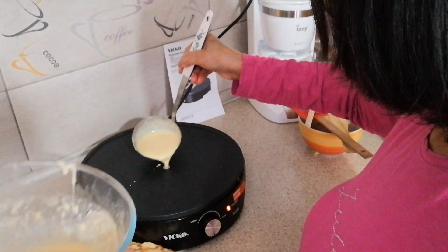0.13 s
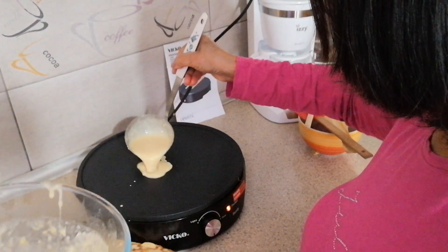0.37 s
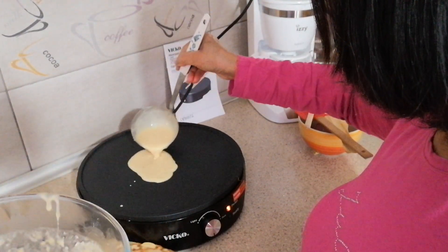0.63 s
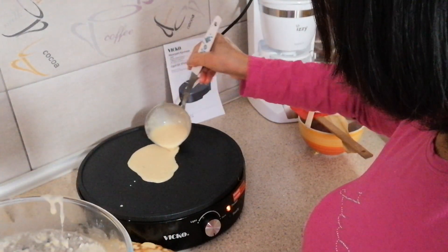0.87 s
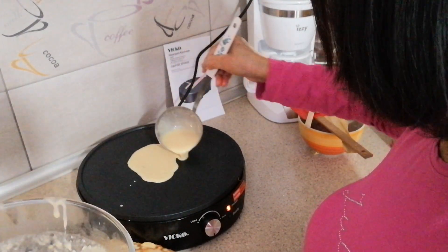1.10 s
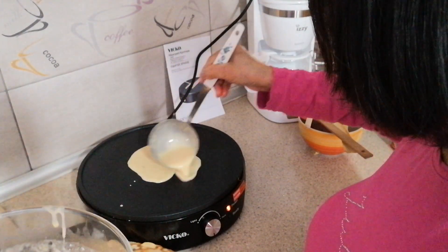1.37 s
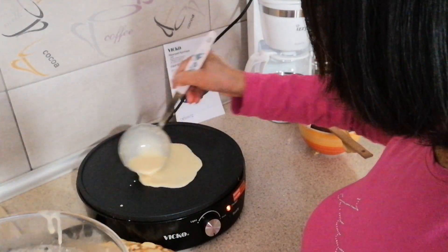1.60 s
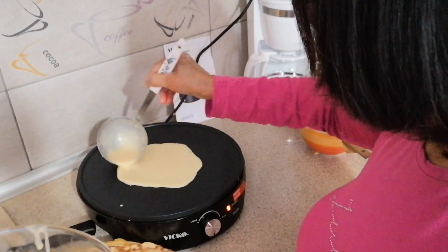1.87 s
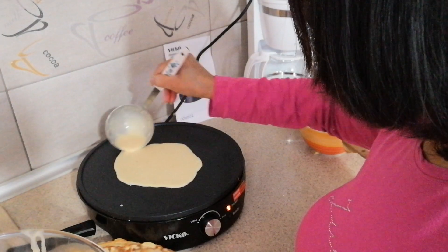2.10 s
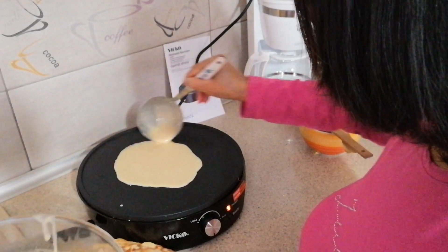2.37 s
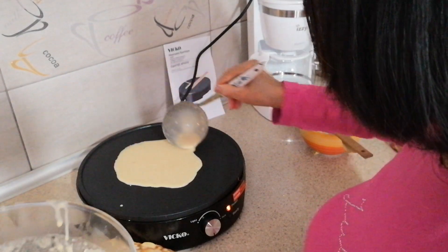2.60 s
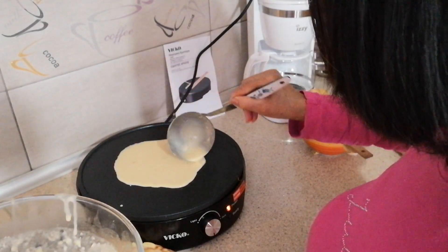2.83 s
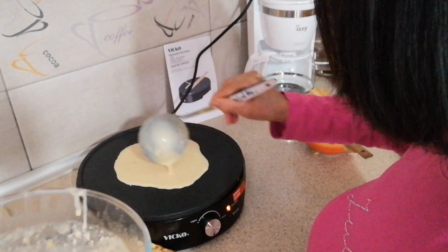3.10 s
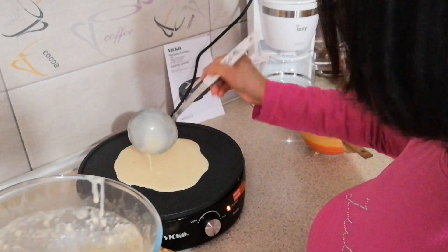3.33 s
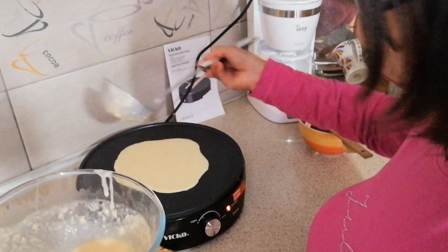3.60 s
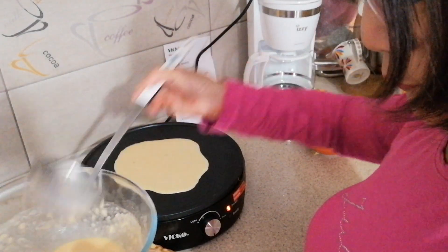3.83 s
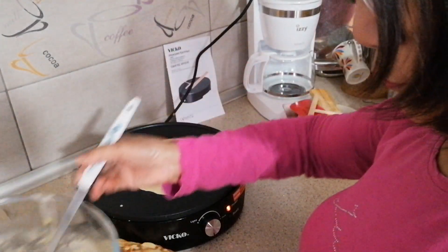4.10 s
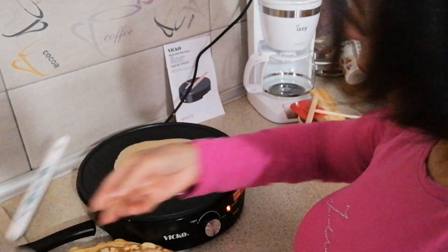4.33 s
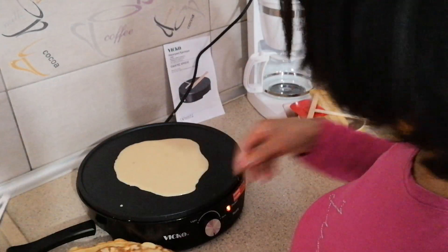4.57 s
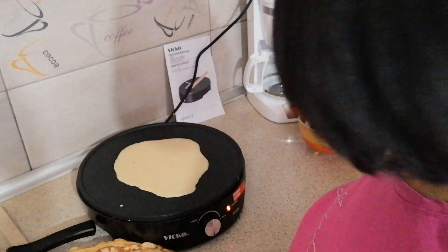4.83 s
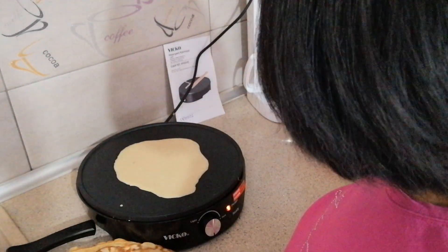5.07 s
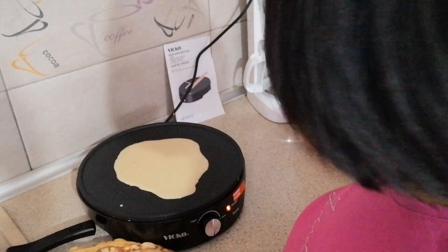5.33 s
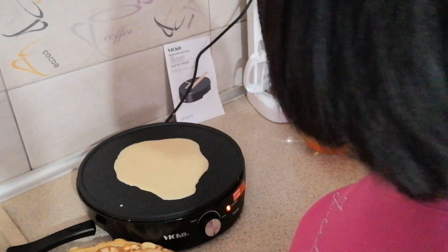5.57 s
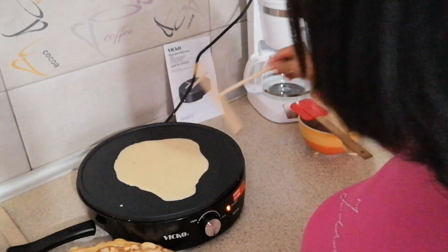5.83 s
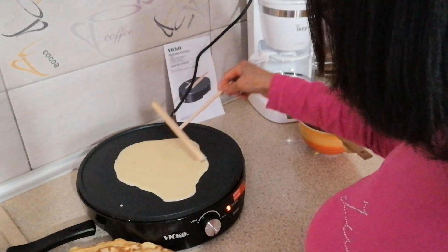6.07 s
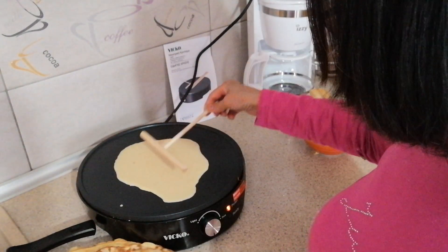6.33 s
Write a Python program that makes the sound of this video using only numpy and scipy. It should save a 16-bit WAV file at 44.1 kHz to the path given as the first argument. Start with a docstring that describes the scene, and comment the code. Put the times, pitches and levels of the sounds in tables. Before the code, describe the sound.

Batter poured onto a hot plate hisses softly and fades, then a steel ladle clinks into a glass bowl and hard knocks rattle the counter.

```python
"""A tiled kitchen: batter is ladled onto a hot plate and sizzles, fading as it sets. The steel ladle is dropped
into a glass bowl, where it clinks; the bowl rocks on the counter and a wooden tool is picked up.
Sizzle, rustle, sliding and room air are coloured noise; struck things are sums of dying modes that the
tiles answer; appliance hum and steam whistles are wavering tones. Two microphones hear it all."""
import sys
import numpy as np
from scipy import signal
from scipy.fft import rfft, irfft, next_fast_len
from scipy.io import wavfile
from scipy.ndimage import uniform_filter1d, map_coordinates

SR = 44100
rng = np.random.default_rng(int(sys.argv[2]) if len(sys.argv) > 2 else 0)


def field_ratio(decibels):
    """Amplitude ratio for a level in dB (20 dB per decade); scalars and array-likes work."""
    return 10 ** (np.asarray(decibels, dtype=float) / 20)


def dump(signal):
    """Clip the signal to [-1, 1] and save it as 16-bit WAV at the path in sys.argv[1]."""
    limited = np.clip(np.atleast_2d(signal).T, -1, 1)
    pcm = np.round(limited * 32767).astype(np.int16)
    wavfile.write(sys.argv[1], SR, pcm)


N = 284048  # samples, 6.44 s


def unit(x):
    """Scaled to rms 1."""
    return x / np.sqrt(np.mean(x ** 2) + 1e-20)


def peaked(x):
    """Scaled to peak 1."""
    return x / np.max(np.abs(x))


def along(points, hz):
    """(Hz, value) points read on a log frequency axis."""
    f, v = np.transpose(points)
    return np.interp(np.log(hz + 1), np.log(f + 1), v)


def wobble(rate):
    """A smooth random curve with rate knots a second."""
    return map_coordinates(rng.standard_normal(int(N * rate / SR) + 4), [np.arange(N) * rate / SR])


def filtered(x, response):
    """x times a complex response of frequency."""
    n = x.shape[-1]
    m = next_fast_len(n + 8192)
    return irfft(rfft(x, m) * response(np.fft.rfftfreq(m, 1 / SR)), m)[..., :n]


def paired(white, spectrum):
    """Two unrelated noises coloured and mixed into left and right, most alike in the bass; rms 1."""
    # How alike the ears are. Each row: frequency in Hz, left-right correlation.
    likeness = [(60, 0.69), (180, 0.75), (550, 0.4), (1650, 0.041), (4970, 0.042), (15000, 0.037)]

    def colour(hz):
        angle = np.arccos(np.clip(along(likeness, hz), -1, 1)) / 2
        return field_ratio(along(spectrum, hz)) * [np.cos(angle), np.sin(angle)]

    mid, side = filtered(white, colour)
    return unit(np.array([mid + side, mid - side]))


def rush(spectrum, patchy_db, grain_db):
    """Stereo noise of rms 1 with patches of random gain; grain_db makes it a hail of uneven tiny bursts."""
    white = rng.standard_normal((2, N)) * field_ratio(grain_db * wobble(900))
    z = signal.stft(white, nperseg=512)[2]
    field = uniform_filter1d(rng.standard_normal(z.shape[1:]), size=6, axis=0)  # smooth over frequency
    field = uniform_filter1d(field, size=12, axis=1)  # and over time
    patchy = signal.istft(z * field_ratio(patchy_db * unit(field)), nperseg=512)[1][:, :N]
    return paired(patchy, spectrum)


def ringing(modes, t, spread_db, first_db, first_t60, rise_s, opposed=True):
    """A struck object's modes at new strengths for each blow; each has an extra part with its own decay."""
    hz, db, t60 = np.transpose(modes)[:, :, None]
    chance = rng.standard_normal((3, len(modes), 1))
    level = db + spread_db * (chance[0] + 0.22 * chance[1:])  # the two ears differ slightly
    decay = field_ratio(-60 * t / t60) + field_ratio(first_db - 60 * t / first_t60)
    sign = (-1) ** (opposed * np.arange(len(modes)))[:, None]  # opposed: neighbouring modes start opposite
    ring = np.sum(sign * field_ratio(level) * decay * np.sin(2 * np.pi * hz * t), axis=1)
    return peaked(ring * (1 - np.exp(-t / rise_s)) ** 2)


def tiles(x, wet_db):
    """A short sound plus a fresh answer of the tiled walls, each frequency dying at its own speed."""
    # How long the walls answer. Each row: frequency in Hz, time to fall 60 dB in seconds.
    wall_t60 = [(100, 0.47), (500, 0.33), (2000, 0.3), (6000, 0.22), (14000, 0.093)]
    noise = paired(rng.standard_normal(x.shape), [(120, -1), (400, -0.5), (800, 0.5)])
    hz, t, z = signal.stft(noise, SR, nperseg=256)
    tail = signal.istft(z * field_ratio(-60 * t / along(wall_t60, hz)[:, None]), SR, nperseg=256)[1]
    tail = tail * (1 - np.exp(-np.arange(tail.shape[1]) / (0.00097 * SR)))  # echoes need time to build up
    wet = signal.fftconvolve(x, tail / np.linalg.norm(tail[0]), axes=1)[:, :x.shape[1]]
    return x + field_ratio(wet_db) * wet


def add(out, s, sound, pan_db, lag_s):
    """Lays a stereo sound into out at s seconds, pan_db louder on the left, where it arrives lag_s later."""
    for ear, side in enumerate((1, -1)):
        piece = out[ear, round((s + side * lag_s / 2) * SR):][:sound.shape[1]]
        piece += field_ratio(side * pan_db / 2) * sound[ear, :len(piece)]


def kitchen():
    """Room air as coloured noise, and appliance hum, each partial a narrow wavering band."""
    # Hum partials. Each row: frequency in Hz, level in dB.
    partials = [(70.0, -79), (145.3, -76.5), (199.2, -75.5), (301.5, -73), (608.3, -80.5), (678.3, -87)]
    # Colour of the room air. Each row: frequency in Hz, relative level in dB.
    air_colour = [(24, -50), (40, 9.5), (166, -11.5), (197, 0.5), (224, -6.5), (301, -1), (325, -3.5),
                  (407, -4.5), (522, -15.5), (653, -16.5), (817, -11.5), (903, -12), (1600, -42),
                  (5050, -22), (15500, -46.5)]
    t = np.arange(N) / SR
    hum = 0
    for hz, db in partials:
        turn = 2 * np.pi * hz * t
        hum = hum + field_ratio(db) * (wobble(12) * np.sin(turn) + wobble(14) * np.cos(turn))
    air_db = -64.5 + 0.72 * wobble(2.68)
    return hum + field_ratio(air_db) * rush(air_colour, patchy_db=2.0, grain_db=1.5)


def sizzle():
    """Steam escapes in fine fizz at first, then in coarser bubbles; both flutter a little."""
    # Steam under the batter. Each row: time in seconds, level of the fine fizz in dB.
    steam = [(0, -58), (.22, -58.5), (.28, -58.5), (.35, -52), (.55, -48), (.8, -49.5), (.92, -54),
             (1.25, -54.5), (1.45, -54.5), (1.8, -58.5), (2.1, -57.5), (2.43, -59.5), (2.65, -56.5),
             (3, -60.5), (3.27, -65), (4.1, -68.5), (5.4, -72), (6.44, -73.5)]
    # Colour of the fine fizz. Each row: frequency in Hz, relative level in dB.
    fizz_colour = [(800, -36.5), (1300, -11), (1750, -6.5), (2100, -8), (2700, -4.5), (3600, -6.5),
                   (4240, -10), (5550, -4.5), (6400, -9.5), (7800, -9.5), (8400, -13), (11000, -8.5),
                   (13000, -13), (14400, -23), (15500, -10.5)]
    # Colour of the coarse bubbling. Each row: frequency in Hz, relative level in dB.
    bubble_colour = [(250, -8.5), (450, -10), (620, -0.5), (800, -6), (1150, -0.5), (1700, -6),
                     (2500, -6.5), (4000, -12), (8000, -68)]
    t = np.arange(N) / SR
    flutter = wobble(6.34)

    fine_db = np.interp(t, *np.transpose(steam)) + 0.21 * flutter
    fine = field_ratio(fine_db) * rush(fizz_colour, patchy_db=1.2, grain_db=1.26)
    # the fizz starts thin and fills out downward as the pool spreads
    thin_hz, thin_db, fills_s, fill_rise_s = 2240, -8, 0.36, 0.1
    low_db = thin_db * (1 - np.clip((t - fills_s) / fill_rise_s, 0, 1))
    low = filtered(fine, lambda hz: 1 / (1 + (hz / thin_hz) ** 10))
    fine = fine + (field_ratio(low_db) - 1) * low

    # coarse bubbling sets in once the batter has spread, then sags as it sets
    start_s, rise_s, before_db, full_db, sag_db_per_s = 0.56, 0.12, -71, -61, 1.74
    since = t - start_s
    coarse_db = before_db + (full_db - before_db) * np.clip(since / rise_s, 0, 1)
    coarse_db = coarse_db - sag_db_per_s * np.clip(since - rise_s, 0, None)
    coarse_db = coarse_db + 0.37 * wobble(4.78) + 0.16 * flutter
    coarse = field_ratio(coarse_db) * rush(bubble_colour, patchy_db=1.86, grain_db=-0.5)
    return field_ratio([[.95], [-.95]]) * (fine + coarse + whistles())  # a little to the left


def knocks():
    """A blow and its rebound ring the slab and the cabinet below it, and shake what stands on the counter."""
    # Things meeting the counter. Each row: start in seconds, levels of slab, cabinet, door panels
    # and rattle of loose things in dB, left over right in dB.
    blows = [(0.106, -50, -76, -46, -49.5, -5), (0.125, -39, -73, -42.5, -47.5, 0),
             (0.16, -46.5, -70, -51, -59, 5), (0.195, -51.5, -76, -52.5, -69, -6),
             (3.449, -73, -60, -73, -69, 4), (3.541, -51, -60, -59, -56.5, -1),
             (4.136, -45.5, -45, -34.5, -66, 1.5), (4.148, -47.5, -34, -55, -68, -1),
             (4.2935, -39, -61, -42.5, -47, -1), (4.624, -62, -37.5, -48.5, -63, 3),
             (4.7, -61, -45, -57.5, -70, 1), (4.83, -9.5, -33, -29, -24.5, -1.5),
             (4.926, -15, -30.5, -26, -32, -3), (4.9315, -15.5, -45, -33, -35, -2),
             (4.962, -25, -47, -33.5, -50, -6), (5.014, -26.5, -48, -33, -49.5, -4),
             (5.06, -19.5, -35, -34, -37.5, -3), (5.066, -23, -50, -44, -39, -2),
             (5.129, -32.5, -64, -37, -50, -3.5), (5.166, -37.5, -44, -47, -39.5, 0.5),
             (5.522, -56, -48.5, -50, -69, 3.5), (5.562, -52, -43, -55, -70, 0),
             (5.605, -38, -37, -42, -45, 1), (5.63, -40, -49, -48.5, -57, 2),
             (5.654, -47, -43, -48.5, -56.5, 2), (5.69, -45, -50, -55.5, -69, 3),
             (5.709, -59, -57, -72, -65, -1)]
    # Modes of the counter slab. Each row: frequency in Hz, relative level in dB, 60 dB decay in seconds.
    slab_modes = [(454, 6.5, 0.036), (575, 7, 0.036), (382, -13, 0.072), (425.7, -5.5, 0.17),
                  (475, -1.5, 0.082), (491, -2.5, 0.075), (544, -4, 0.06), (614, 0, 0.095), (687, 0, 0.08),
                  (758, -4, 0.15), (824.4, -3.5, 0.16), (901, -4.5, 0.18), (955, -8.5, 0.17),
                  (1048, -5, 0.1), (1144, -1.5, 0.072), (1248, -5, 0.14), (1383, -11.5, 0.1),
                  (1533, -5.5, 0.098), (1720, -11.5, 0.091)]
    # Modes of the cabinet. Each row: frequency in Hz, relative level in dB, 60 dB decay in seconds.
    cabinet_modes = [(45.3, -8, 0.29), (64.4, -10.5, 0.077), (85.7, -5, 0.28), (104.5, -8.5, 0.12),
                     (115.6, 4.5, 0.1), (144.6, -2, 0.11)]
    # Modes of the cabinet doors. Each row: frequency in Hz, relative level in dB, 60 dB decay in seconds.
    door_modes = [(196, -0.5, 0.1), (235, -3, 0.31), (267.4, -3, 0.17), (342, -8.5, 0.085)]
    # Colour of the rattle. Each row: frequency in Hz, relative level in dB.
    rattle_colour = [(300, -3), (600, 2), (1200, -4), (1600, -3.5), (2200, -5), (3200, -12.5),
                     (4000, -15.5), (7000, -32), (15000, -52)]
    out, t = np.zeros((2, N)), np.arange(SR // 2) / SR
    # every blow lands again 29 ms later, softer and duller
    rebounds = np.add(blows, [0.029, -17.5, -8.5, -8.5, -17.5, 0])
    body_pan_db = 3  # the cabinet sounds further left than the blow
    for s, slab_db, boom_db, panel_db, rattle_db, pan_db in [*blows, *rebounds]:
        slab = -field_ratio(slab_db) * ringing(slab_modes, t, spread_db=1.5, first_db=4.0, first_t60=0.027,
                                       rise_s=0.0015, opposed=False)
        boom = field_ratio(boom_db) * ringing(cabinet_modes, t, spread_db=3.0, first_db=-8.5, first_t60=0.075,
                                      rise_s=0.00064)
        panel = -field_ratio(panel_db) * ringing(door_modes, t, spread_db=3.0, first_db=-13.0, first_t60=0.027,
                                         rise_s=0.0015, opposed=False)
        shake = (field_ratio(-60 * t / 0.15) + field_ratio(-0.5 - 60 * t / 0.017)) * (1 - np.exp(-t / 0.00062))
        rattle = field_ratio(rattle_db) * shake * paired(rng.standard_normal((2, len(t))), rattle_colour)
        body = field_ratio([[body_pan_db / 2], [-body_pan_db / 2]]) * (boom + panel)
        add(out, s, tiles(slab + rattle + body, wet_db=-5.5), pan_db, lag_s=-0.00022)
    return out


def dish():
    """Small crockery that is brushed or jolted answers with one faint mode at a time."""
    # Crockery touched. Each row: start in seconds, frequency in Hz, level in dB, 60 dB decay in seconds.
    pings = [(0.109, 1532, -45.5, 0.073), (0.131, 1580, -54, .09), (3.546, 2530, -60, 0.14),
             (5.53, 2900, -66, 0.2), (5.561, 1029, -54, 0.13), (5.69, 970, -63, 0.092)]
    out, t = np.zeros((2, N)), np.arange(SR // 4) / SR
    for s, hz, db, t60 in pings:
        ping = field_ratio(db - 60 * t / t60) * np.sin(2 * np.pi * hz * t) * (1 - np.exp(-t / 0.003))
        add(out, s, tiles(np.array([ping, ping]), wet_db=-2), pan_db=6.0, lag_s=-0.0003)
    return out


def spits():
    """Each bright tick is a puff of noise that drops at once and leaves a weak tail; a duller one loses its top."""
    # Spitting bubbles and light touches. Each row: start in seconds, level in dB, weight of the top octave in dB.
    ticks = [(0.173, -46, 0), (2.844, -44, 2), (2.956, -46.5, -2), (3.117, -45, 2), (3.258, -45, 0),
             (3.5432, -41, -5), (3.769, -52, -2), (4.067, -45.5, 1), (4.631, -52, -12), (5.605, -39.5, -24),
             (6.3876, -54.5, 0)]
    out, t = np.zeros((2, N)), np.arange(SR // 4) / SR
    for s, db, top_db in ticks:
        colour = [(1200, -16.0), (3000, 0.5), (5000, 2.5), (10000, top_db)]
        puff = (field_ratio(-60 * t / 0.026) + field_ratio(-15.0 - 60 * t / 0.16)) * rng.standard_normal((2, len(t)))
        puff = filtered(puff, lambda hz: field_ratio(along(colour, hz)))
        add(out, s, field_ratio(db) * tiles(peaked(puff), wet_db=-1.0), pan_db=3, lag_s=0)
    return out


def whistles():
    """Steam whistles from under the batter's edge: each a faint unsteady tone that swells and fades."""
    # Whistles. Each row: start in seconds, length in seconds, frequency in Hz, level in dB.
    tones = [(.3, 0.11, 3170, -66), (.3, 0.1, 2620, -67), (0.477, 0.15, 1780, -60), (.5, .1, 2510, -70),
             (.61, 0.21, 1293, -64.5), (.65, .07, 2210, -63), (.75, .1, 2760, -70), (1.15, .2, 1325, -69.5)]
    t = np.arange(N) / SR
    out = np.zeros((2, N))
    for s, length, hz, db in tones:
        swell = np.sin(np.pi * np.clip((t - s) / length, 0, 1))
        turn = 2 * np.pi * hz * t
        for ear in range(2):
            out[ear] += field_ratio(db) * swell * (wobble(44.5) * np.sin(turn) + wobble(46.3) * np.cos(turn))
    return out


def rustle():
    """A brief dull rustle, perhaps a sleeve: one swell of grainy mid-band noise."""
    centre_s, width_s, level_db = 3.62, 0.057, -58.5
    swell = np.exp(-((np.arange(N) / SR - centre_s) / width_s) ** 2)
    colour = [(400, -10), (1000, -9), (1800, -4), (2600, -13), (6000, -23)]
    return field_ratio(level_db) * swell * rush(colour, patchy_db=3.5, grain_db=2.0)


def slide():
    """The ladle slides through batter along the glass: a short wet hiss that swells, holds and dies."""
    start_s, attack_s, hold_s, t60_s, level_db = 4.055, 0.03, 0.042, .13, -62.5
    since = np.arange(N) / SR - start_s
    fading = np.clip(since - attack_s - hold_s, 0, None)
    colour = [(800, -15), (2500, -1.0), (5000, 2), (9000, -12.0), (15000, -16)]
    hiss = rush(colour, patchy_db=-2.5, grain_db=2.0)
    return np.clip(since / attack_s, 0, 1) * field_ratio(level_db - 60 * fading / t60_s) * hiss


def clinks():
    """Steel on glass: a sharp crack and the ring of ladle and bowl, whose low modes are lifted anew each time."""
    # Ladle against glass. Each row: start in seconds, level in dB, left over right in dB, lift of the low
    # modes in dB, crack relative to the ring in dB, lift of the modes near 4.6 kHz in dB.
    contacts = [(4.2725, -25, 5, 4.5, -8, 0.5), (4.2944, -30, 6, 13, -14, -3),
                (4.3319, -21, 4, 0, -9.5, 1.5), (4.356, -19.5, 1, 5, -13.5, 4.5),
                (4.835, -27, 2, -1, -13, -7), (4.8615, -24.5, -0.5, 1, -7, -4),
                (4.8956, -24.5, 3, 5.5, -12, -3.5), (4.93, -37, -8, 9, -11, 5),
                (5.078, -36.5, 6, -2, -10, -7), (5.0833, -28.5, -3, 7.5, -17, -4),
                (5.1043, -34.5, -5, 8, -14, 1), (5.1288, -47, 0, -1, -14, 8),
                (5.1605, -35.5, -6, 3, -16, -0.5), (5.1886, -48.5, 2, 6, -9, -3),
                (5.205, -51, -5, 5, -6, 0)]
    # Modes of ladle and bowl. Each row: frequency in Hz, relative level in dB, 60 dB decay in seconds.
    ladle_modes = [(651, 0, 0.053), (1113, -17, 0.089), (1428, -2, 0.094), (1863, -4, 0.14),
                   (1928, -9.5, 0.32), (2070, -13, 0.4), (2096, -10.5, 0.23), (2147, -15.5, 0.37),
                   (2570, -12, 0.07), (2900, -18, .06), (3185, -2, 0.16), (3278, 2, 0.078),
                   (3570, -18, 0.12), (4700, -21, 0.3), (4670, -13.5, 0.235), (4600, 9, 0.029),
                   (5184, -20, 0.18), (5700, -19, 0.18), (6000, -18, 0.18), (6260, -6, 0.1),
                   (6100, -15, 0.41), (6530, -19.5, .03), (7840, -16, 0.142), (8900, -19.5, 0.17),
                   (9580, -24, 0.1), (10380, -17, 0.11), (11200, -35, .12)]
    # Colour of the crack. Each row: frequency in Hz, relative level in dB.
    crack_colour = [(500, -17), (1500, -4), (3300, -5), (4050, -38), (4700, -8.5), (6500, -7.5),
                    (8300, -16.5), (11000, -7), (15000, -26)]
    out, t = np.zeros((2, N)), np.arange(SR // 2) / SR
    chatter = field_ratio(-60 * t / 0.018) + field_ratio(-14.0 - 60 * t / 0.22)  # the handle keeps buzzing against the rim
    for s, db, pan_db, low_db, crack_db, bright_db in contacts:
        crack = field_ratio(crack_db) * chatter * paired(rng.standard_normal((2, len(t))), crack_colour)
        # low and bright modes are lifted by a different amount at each contact
        modes = [(hz, level + low_db * (hz < 2800) + bright_db * (4400 < hz < 4800), t60)
                 for hz, level, t60 in ladle_modes]
        ring = ringing(modes, t, spread_db=1.0, first_db=16, first_t60=0.013, rise_s=0.0012)
        add(out, s, field_ratio(db) * tiles(ring + crack, wet_db=-5.0), pan_db, lag_s=0.0005028)
    return out


def push():
    """The ladle's round bottom lands once: one pressure pulse and its short recoil."""
    start_s, width_s, level_db = 4.2945, 0.00029, -22
    out, u = np.zeros((2, N)), np.arange(SR // 4) / SR / width_s - 2
    pulse = (1 - 0.95 * u * u) * np.exp(-u * u / 2)
    thump = field_ratio(level_db) * tiles(np.array([pulse, pulse]), wet_db=-6.0)
    add(out, start_s, thump, pan_db=6, lag_s=0.00028)
    return out


def scene():
    """All sources at the two microphones; the steady ones sit a little to the left."""
    room = field_ratio([[1.05], [-1.05]]) * kitchen()
    return room + sizzle() + knocks() + dish() + spits() + rustle() + slide() + clinks() + push()


def low_pass(x):
    """Removes everything above the highest recorded frequency."""
    return signal.sosfilt(signal.butter(12, 15710, fs=SR, output="sos"), x)


def record(dry):
    """The recorder rolls off the deepest bass and keeps little over 15 kHz."""
    band = lambda hz: (1j * hz / (24 + 1j * hz)) ** 4 / (1 + (hz / 15150) ** 100)
    mix = filtered(dry, band)
    return low_pass(mix)


dry = scene()
out = record(dry)
dump(out)
```